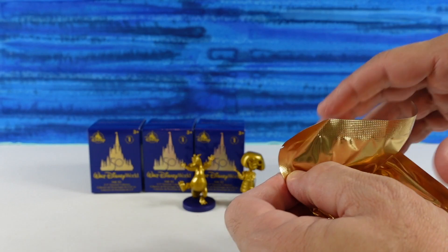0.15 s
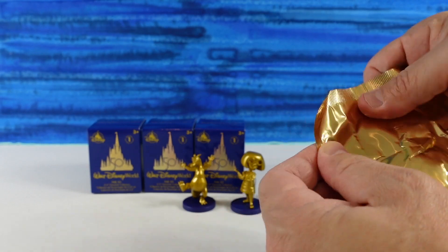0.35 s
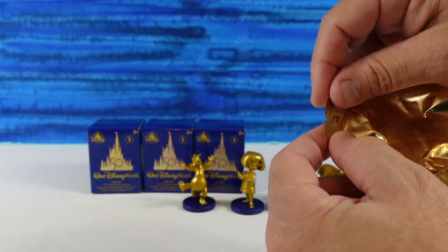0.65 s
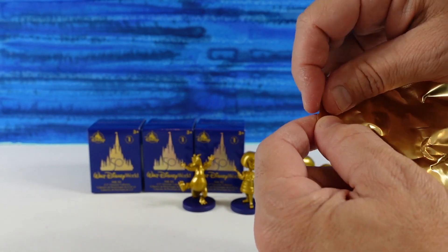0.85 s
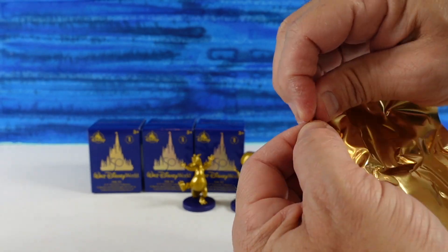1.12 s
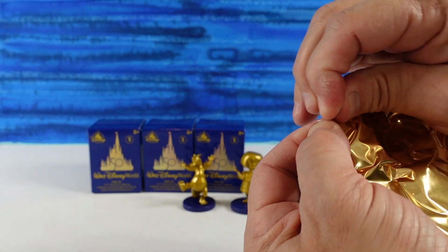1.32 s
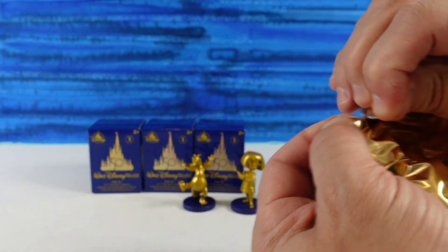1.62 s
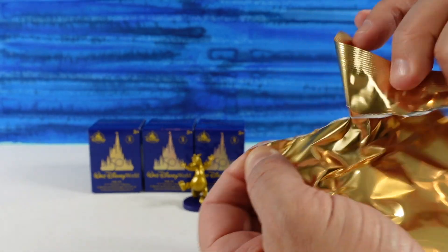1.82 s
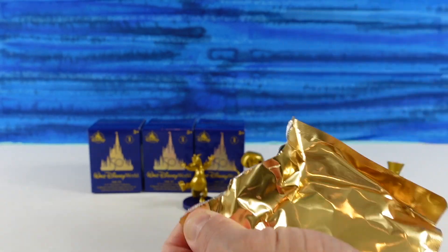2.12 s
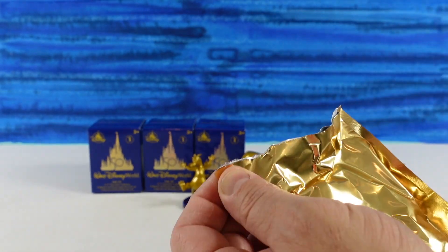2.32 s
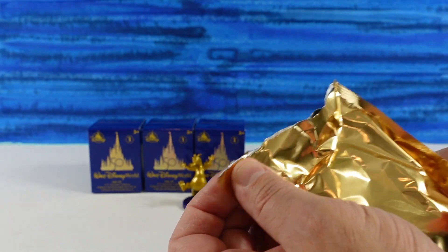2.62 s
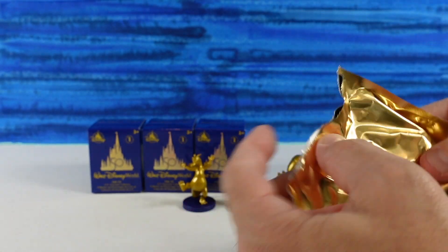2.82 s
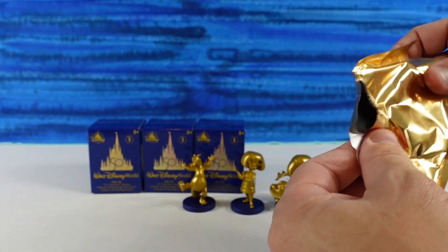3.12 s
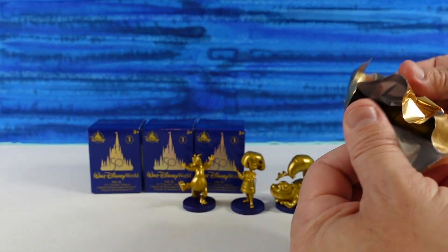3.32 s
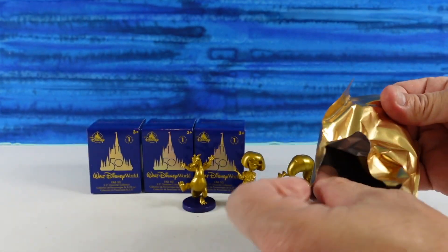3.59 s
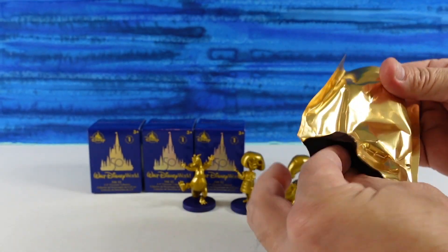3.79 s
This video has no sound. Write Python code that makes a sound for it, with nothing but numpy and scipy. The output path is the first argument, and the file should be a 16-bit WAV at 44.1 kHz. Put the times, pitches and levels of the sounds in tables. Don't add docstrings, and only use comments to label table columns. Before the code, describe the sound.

Foil pouch crinkling close to the microphone in a small room, with irregular crisp cracks over fine rustle, soft skin rubbing and faint table knocks; two near-quiet gaps separate the handling, and it ends still crackling.

```python
import sys
import numpy as np
from scipy import signal
from scipy.fft import rfft, irfft
from scipy.io import wavfile
from scipy.ndimage import uniform_filter1d

SR = 44100
rng = np.random.default_rng(int(sys.argv[2]) if len(sys.argv) > 2 else 0)


def int16_out(signal):
    q = np.round(np.clip(np.atleast_2d(signal).T, -1, 1) * 32767)
    wavfile.write(sys.argv[1], SR, q.astype(np.int16))


def magnitude_from_level(level_db):
    exponent = np.asarray(level_db, float) / 20
    return 10 ** exponent


N = 174195

# (t/s, level/dB)
HOLD = [(.02, -39), (.1, -52.5), (.3, -50), (.5, -41.5), (1.0, -58), (1.45, -44.5), (1.63, -52), (1.8, -37),
        (2.1, -35.5), (2.25, -50), (2.6, -64.5), (2.66, -43), (2.9, -46.5), (3.5, -40), (3.76, -35.5),
        (3.805, -42), (3.86, -33.5), (3.95, -30.5)]
LEFT_RIGHT = np.array([[1], [-1]])


def unit(x):
    return x / np.sqrt(np.mean(x ** 2))


def band(x, lo_hz, hi_hz):
    sos = signal.butter(1, [lo_hz, min(hi_hz, .45 * SR)], "band", fs=SR, output="sos")
    return signal.sosfilt(sos, x)


def tail(t60_s, channels):
    t = np.arange(int(.4 * SR)) / SR
    h = rng.standard_normal((channels, len(t))) * 1000 ** (-t / t60_s)
    return h / np.sqrt((h ** 2).sum(1, keepdims=True))


def swell(t, start_s, end_s, rise_s, fall_s):
    return np.exp(np.minimum(np.minimum((t - start_s) / rise_s, (end_s - t) / fall_s), 0))


def hold_db(t):
    return np.interp(t, *np.array(HOLD).T)


def foil_colour(f, hz):
    below, above = 0.9, 1.295
    ring_db, radiate_hz = 4, 424
    dulling = 0.37
    r = f / hz
    ring = magnitude_from_level(ring_db * np.exp(-(np.log(r) / .35) ** 2))
    radiation = f ** 2 / (f ** 2 + radiate_hz ** 2)
    return ring * radiation * r ** below / (1 + r ** (below + above * (4000 / hz) ** dulling))


def creases(at_s, db, hz, size):
    snap_s, thump_s, thump_lag_s, split_hz = .00042, .0015, .0005, 3600
    t = np.arange(size) / SR
    f = np.fft.rfftfreq(size, 1 / SR) + 1
    quick, slow, side = rng.standard_normal((len(at_s), 3, size)).transpose(1, 0, 2)
    low = 1 / (1 + (f / split_hz) ** 2)
    since = np.maximum(t - 16 / SR, 0)
    crack = np.sqrt(since) * np.exp(-since / snap_s) / np.sqrt(snap_s)
    thump = since / (since + thump_lag_s) * np.exp(-since / thump_s)
    spectrum = rfft(quick * crack) * (1 - low) + rfft(slow * thump) * low
    snap = irfft(spectrum * foil_colour(f, hz[:, None]), size)
    snap *= magnitude_from_level(db)[:, None] / np.abs(snap).max(1, keepdims=True)
    at = (np.round(at_s * SR).astype(int)[:, None] + np.arange(size)).ravel()

    def lay(v):
        return np.bincount(at, v.ravel(), N + 2 * size)[17:N + 17]

    off_centre = side[:, :1] * snap + side[:, 1:2] * (np.roll(snap, 2, axis=1) - snap)
    return np.array([lay(snap), lay(off_centre)])


def snaps():
    # (t/s, peak/dB,
    # centre f/Hz)
    buckles = [(0.0094, -6, 2300), (0.0245, -13.5, 2050), (0.195, -4.5, 4270), (0.3185, -1.5, 4400),
               (0.336, -5.5, 3470), (0.3551, -7, 2500), (0.3769, 0, 3430), (0.3809, -17, 3530),
               (0.3852, -1, 4830), (0.3931, -0.5, 3420), (0.4009, -7, 5240), (0.4046, -8.5, 3200),
               (0.4098, -9.5, 4300), (0.4212, -11, 2900), (0.4255, -7, 3800), (0.4323, -7, 2180),
               (0.4579, -3.5, 3570), (0.4828, -23, 3450), (0.5014, -12.5, 3030), (0.5464, -24, 3000),
               (0.5544, -14, 2600), (0.5833, -14.5, 3570), (0.7085, -5, 5670), (0.7205, -23, 4000),
               (0.7272, -24, 1520),
               (1.0701, -17.5, 2770), (1.075, -8, 7800), (1.081, -16, 2300), (1.1174, -11, 2200),
             (1.1657, -3, 6800), (1.1747, -3, 4900), (1.2602, -12.5, 2660), (1.296, -3, 3400),
             (1.3087, -7, 2220), (1.349, -13.5, 2900), (1.5711, -9.5, 6800),
               (1.6912, -2.5, 5440), (1.74, -13, 3180), (1.749, -3.5, 3330), (1.7526, -6.5, 3000),
            (1.764, -4.5, 2000), (1.793, -6, 4860), (1.805, -12, 3000), (1.8181, -1, 4400),
            (1.838, -10, 5250), (1.8673, -5, 3700), (1.8835, -4.5, 4470), (1.8917, 0, 7060),
            (1.9233, -5, 5000), (1.9281, -4, 1810), (1.9357, -1, 5800), (1.939, -1, 5500),
            (1.9603, -8, 4700), (1.9831, -8, 3300), (1.9995, -2, 6100), (2.0376, -9, 1670),
            (2.0429, -5, 4000), (2.0538, -3, 6030), (2.0651, -26, 3870), (2.0741, -12, 6600),
            (2.0854, -9.5, 2750), (2.09, -3, 2250), (2.1034, -10.5, 5260), (2.118, -4.5, 3230),
            (2.128, 1, 2200),
               (2.426, -14, 2770), (2.6824, -36, 2500), (2.689, -22, 5960), (2.693, -18, 2430),
                 (2.752, -19, 3230), (2.7647, -6, 2600), (2.7934, -14.5, 5630), (2.8157, -18, 1660),
                 (2.9431, -26, 2800), (3.0899, -8.5, 3280), (3.118, -18, 3800),
               (3.213, -11.5, 4030), (3.2374, -7, 4300), (3.256, -1.5, 3600), (3.269, -11.5, 5960),
              (3.317, -11, 2600), (3.3259, -3.5, 3900), (3.3385, -6, 3130), (3.3636, -1.5, 3670),
              (3.3746, -8, 4900), (3.3838, -2, 6440), (3.4209, -16, 2420), (3.426, -4, 3340),
              (3.4382, -7, 3200), (3.4857, -12.5, 3950), (3.525, -12, 3280), (3.5426, -3.5, 2780),
              (3.5649, -8, 1490), (3.5717, -9.5, 2100), (3.5778, -3, 2920), (3.5945, -4.5, 4220),
              (3.603, -0.5, 5650), (3.6145, -10, 2200), (3.6777, -1.5, 3900), (3.7256, -10.5, 2120),
              (3.8731, -8, 2600), (3.9164, -1.5, 5270), (3.945, -21.5, 2780),
               (0.017, -19, 9500), (.1116, -47, 4500), (0.1338, -31, 4600), (0.181, -32, 4000),
             (.2075, -22.5, 5500), (0.2866, -36, 2200), (0.3309, -13, 3000), (.4695, -17, 2480),
             (0.623, -29, 1310), (0.6296, -23, 4000), (0.6807, -31, 1450), (0.7812, -30.5, 1340),
             (1.0627, -29, 3030), (1.131, -20, 4930), (1.154, -21, 2290), (1.265, -18, 3020),
             (1.5014, -35, 2000), (1.5189, -30.5, 2470), (1.541, -38, 13000), (1.628, -43, 12900),
             (1.669, -30, 2000), (1.6851, -25, 1800), (2.299, -31.5, 5000), (2.3557, -36, 6500),
             (2.3996, -32, 10000), (2.6227, -27.5, 2600), (2.634, -35.5, 3500), (2.6681, -44, 2480),
             (2.779, -20, 8000), (2.9226, -25, 2770), (2.96, -24, 2600), (3.0116, -33, 2770),
             (3.155, -26.5, 710), (3.173, -30, 3130), (3.1943, -14, 3660), (3.501, -14.5, 2360),
             (3.514, -22, 3960), (3.652, -16, 2585), (3.691, -27, 5000), (3.7015, -16.5, 2290),
             (3.741, -15, 2460), (3.8286, -15.5, 2600), (3.8579, -21, 3000), (3.8845, -10.5, 4500),
             (3.8891, -15.5, 1330), (3.9485, -7, 2700)]
    at_s, peak_db, hz = np.array(buckles).T
    return creases(at_s, peak_db, hz, size=256)


def rustle():
    # (start t/s, end t/s, level/dB, centre f/Hz)
    squeezes = [(0.356, 0.42, -23.5, 2720), (0.462, 0.46, -29.5, 2570), (0.552, 0.59, -34.5, 3270),
                (0.623, 0.6, -34, 3800), (0.713, 0.71, -27.5, 3130), (0.841, 0.86, -43, 6000),
                (1.07, 1.09, -35, 3050), (1.117, 1.115, -38, 2560), (1.169, 1.206, -32.5, 3730),
                (.74, 0.783, -61, 1220), (1.26, 1.255, -34, 2070), (1.288, 1.46, -47.5, 2430),
                (2.431, 2.5, -48.5, 2600), (2.625, 2.3, -46, 2760), (1.679, 1.74, -31, 3420),
                (1.714, 1.772, -18, 3700), (1.888, 1.96, -24.5, 3170), (2.049, 2.058, -22, 3170),
                (2.1, 2.113, -49, 2960), (2.127, 2.134, -19.5, 2580), (2.693, 2.694, -32.5, 2700),
                (2.751, 2.767, -31, 2710), (2.963, 2.96, -34, 3240), (3.089, 3.1, -31, 3350),
                (3.193, 3.26, -36.5, 2920), (3.314, 3.42, -29, 3960), (3.444, 3.36, -26, 3240),
                (3.545, 3.623, -32.5, 2980), (3.733, 3.78, -31, 2950), (3.879, 3.888, -28.5, 3500)]
    rise_s, fall_s, held_grain_db, foil_hz = 0.0081, 0.014, -6, 2600
    tiny_per_s, scatter_db, spread_oct = 3200, 5, 1
    t = np.arange(N) / SR
    power = magnitude_from_level(hold_db(t) + held_grain_db) ** 2
    pitch = power * np.log(foil_hz)
    for start_s, end_s, db, hz in squeezes:
        p = (magnitude_from_level(db) * swell(t, start_s, end_s, rise_s, fall_s)) ** 2
        power = power + p
        pitch = pitch + p * np.log(hz)
    when, luck, detune = rng.random((int(tiny_per_s * N / SR), 3)).T
    at = (when * N).astype(int)
    tiny_hz = np.exp(pitch / power)[at] * 2 ** (spread_oct * 2 * (detune - .5))
    tiny_db = -scatter_db * np.log(luck + 0.054)
    x = creases(at / SR, tiny_db, tiny_hz, size=160)
    return x / np.sqrt(np.mean(x[0] ** 2)) * np.sqrt(power)


def flicker(rate_hz):
    k = int(SR / rate_hz)
    steps = np.repeat(rng.standard_normal(N // k + 1), k)
    return magnitude_from_level(4 * unit(uniform_filter1d(steps, k)[:N]))


def friction():
    # (start t/s, end t/s, level/dB, centre f/Hz)
    scrapes = [(.2, 0.232, -49, 2200), (.56, 0.585, -41.5, 1320), (0.72, 0.787, -52, 1350),
               (0.82, 0.94, -58, 1420), (1.367, 1.464, -51.5, 3040), (1.523, 1.556, -51.5, 2600),
               (2.18, 2.3, -61, 2600), (2.426, 2.516, -53, 2600), (2.62, 2.735, -45.5, 2480),
               (2.82, 2.887, -74, 2870), (3.538, 3.612, -37, 2950), (3.734, 3.78, -43, 2750),
               (3.818, 3.837, -37, 2600)]
    half_width_oct, rise_s, fall_s = .3, 0.00079, 0.018
    rub_db, rub_top_db = -3, -13
    t = np.arange(N) / SR
    skin = rng.standard_normal((2, N)) * flicker(90)
    hiss = unit(band(skin, 780, 6800)) + magnitude_from_level(rub_top_db) * unit(band(skin, 4000, 24000))
    out = magnitude_from_level(hold_db(t) + rub_db) * hiss
    for start_s, end_s, db, hz in scrapes:
        lo_hz, hi_hz = hz * 2 ** -half_width_oct, hz * 2 ** half_width_oct
        note = unit(band(band(skin, lo_hz, hi_hz), lo_hz, hi_hz))
        out = out + magnitude_from_level(db) * swell(t, start_s, end_s, rise_s, fall_s) * note
    return out


def pouch(foil):
    t60_s, hz, level_db = 0.063, 2200, -13
    cavity = band(tail(t60_s, channels=1)[0], hz / 4, hz * 3)
    return magnitude_from_level(level_db) * signal.fftconvolve(foil, cavity)[:N]


def table(shake):
    # (t/s, level/dB)
    knocks = [(.004, -17), (.014, -20), (1.89, -28), (2.039, -34.5), (2.129, -36), (2.345, -47),
              (2.431, -34), (2.636, -38)]
    # (f/Hz, level/dB, t60/s)
    modes = [(97, -17, .2), (174, -11, .32), (272, -13, .24), (436, -22, .2)]
    handling_db, body_db = -48.5, -20.5
    push = magnitude_from_level(handling_db) * shake
    for at_s, db in knocks:
        push[int(at_s * SR)] += magnitude_from_level(db)
    t = np.arange(int(.4 * SR)) / SR
    ring = sum(magnitude_from_level(db) * np.sin(2 * np.pi * hz * t) * 1000 ** (-t / t60_s) for hz, db, t60_s in modes)
    body = unit(band(band(tail(.2, channels=1)[0], 90, 700), 90, 700))
    return signal.fftconvolve(push, ring + magnitude_from_level(body_db) * body)[:N]


def room(mid):
    level_db, t60_s, top_db, top_t60_s = -17, .24, -8, .14
    h = band(tail(t60_s, channels=3), 89, 8800)
    h = h + magnitude_from_level(top_db) * band(tail(top_t60_s, channels=3), 2200, 15500)
    both, own = np.split(h, [1])
    walls = np.pad(both + .3 * own, ((0, 0), (200, 0)))
    return magnitude_from_level(level_db) * signal.fftconvolve(mid[None], walls, axes=1)[:, :N]


def air():
    # (f/Hz, level/dB)
    spectrum = [(40, 9), (150, -1), (1300, -11), (16000, -43)]
    f = np.maximum(np.fft.rfftfreq(N, 1 / SR), 1)
    hz, db = np.array(spectrum).T
    shape = magnitude_from_level(np.interp(np.log(f), np.log(hz), db))
    mid, side = irfft(rfft(rng.standard_normal((2, N))) * shape, N)
    return magnitude_from_level(-53) * unit(mid + 0.6 * side * LEFT_RIGHT)


def scene():
    width_db, pan_db, side_hz = -24.5, 0.67, 3500
    mid, side = snaps() + rustle() + friction()
    mid = mid + pouch(mid)
    mid = mid + table(mid)
    side = side + 0.56 * band(side, side_hz / 2, side_hz * 2)
    near = (mid + magnitude_from_level(width_db) * side * LEFT_RIGHT) * magnitude_from_level(-pan_db * LEFT_RIGHT / 2)
    return near + room(mid) + air()


def low_pass(x):
    return signal.sosfilt(signal.butter(12, 16830, fs=SR, output="sos"), x)


def record(dry):
    low_cut_hz, top_hz = 165, 16000
    x = .75 * np.tanh(dry / .75)
    x = signal.sosfilt(signal.butter(3, low_cut_hz, "high", fs=SR, output="sos"), x)
    x = signal.sosfilt(signal.cheby2(12, 60, 1.062 * top_hz, fs=SR, output="sos"), x)
    return low_pass(x)


dry = scene()
out = record(dry)
int16_out(out)
```